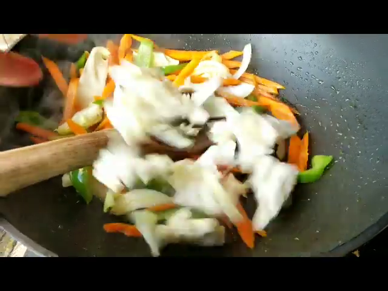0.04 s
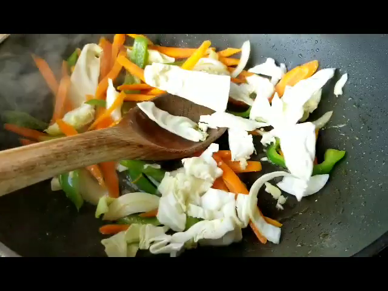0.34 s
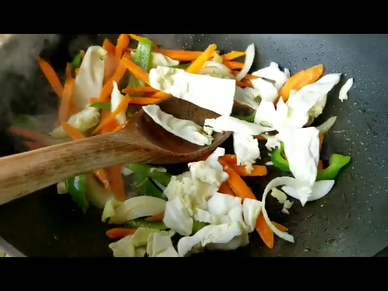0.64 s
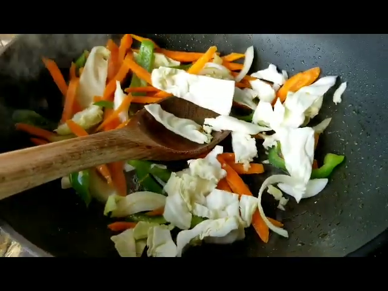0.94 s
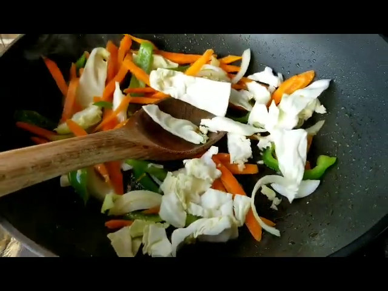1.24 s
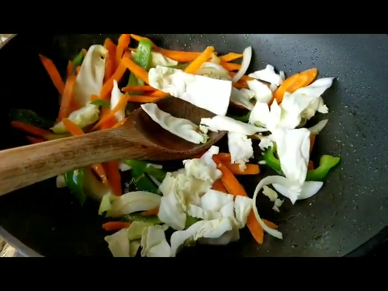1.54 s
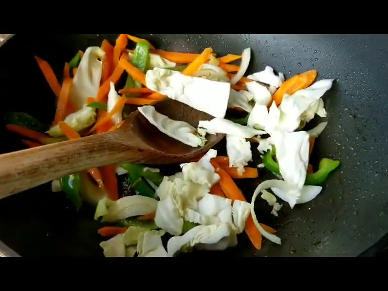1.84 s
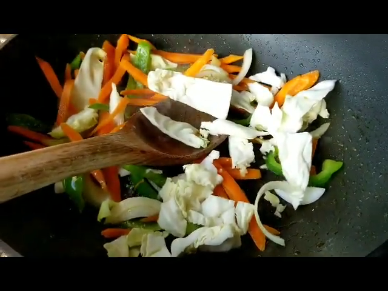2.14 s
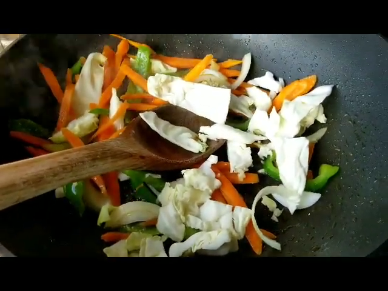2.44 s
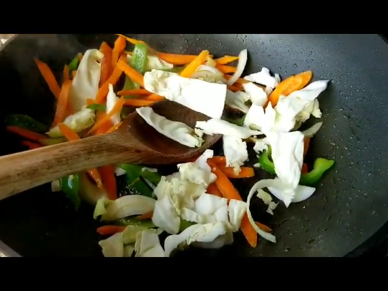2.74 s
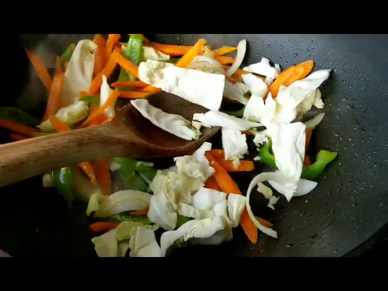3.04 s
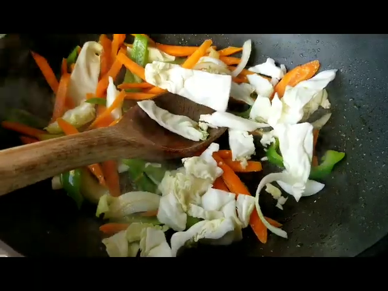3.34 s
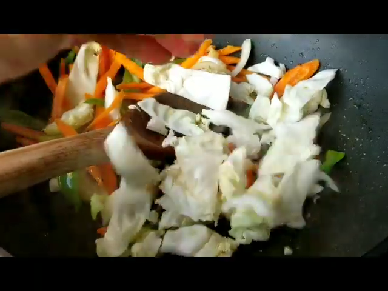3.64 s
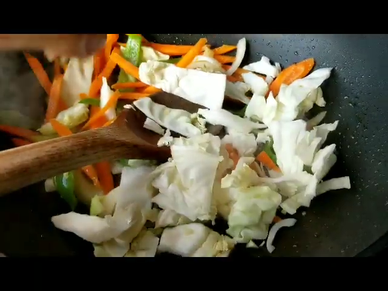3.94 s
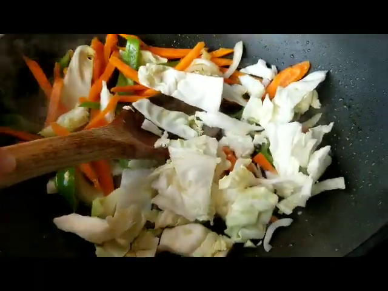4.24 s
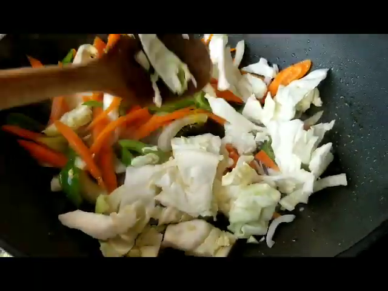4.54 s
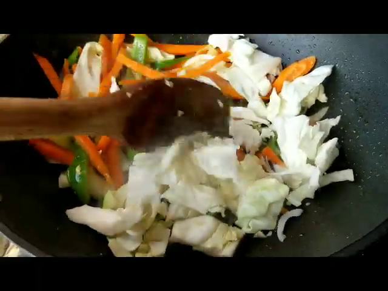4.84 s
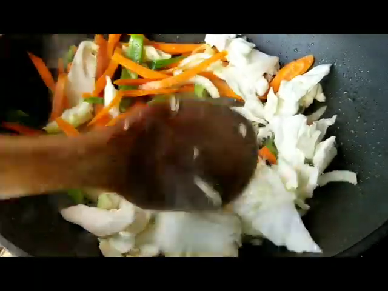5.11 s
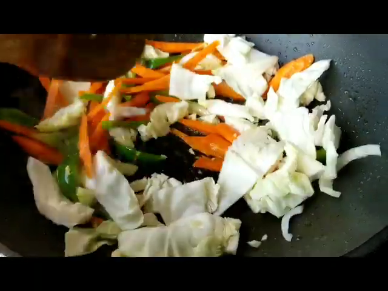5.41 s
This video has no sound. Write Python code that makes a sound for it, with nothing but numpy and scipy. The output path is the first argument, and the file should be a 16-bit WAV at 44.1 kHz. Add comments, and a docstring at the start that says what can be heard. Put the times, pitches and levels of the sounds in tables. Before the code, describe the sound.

Cut vegetables fry in a wok, close to the microphone in a small kitchen. A steady, bright sizzle runs throughout, dotted with sharp pops of oil, and kitchenware clanks lightly early on. Past the middle, a handful of cabbage lands with crisp snaps and the sizzle swells. A wooden spoon then pushes through the leaves with soft knocks, and the hiss flares again. A faint appliance hum lies underneath.

```python
"""A small kitchen, close to a wok of cut vegetables frying in hot oil.
Countless tiny steam bursts make the sizzle; single drops of oil spit above it.
Handfuls of cabbage land and a wooden spoon stirs: leaves snap and the sizzle flares.
Kitchenware knocks and rings the metal. An appliance hum and a draught lie underneath."""
import sys
import numpy as np
from scipy import signal
from scipy.fft import rfft, irfft
from scipy.io import wavfile
from scipy.ndimage import uniform_filter1d

SR = 44100
rng = np.random.default_rng(int(sys.argv[2]) if len(sys.argv) > 2 else 0)


def wav_record(signal):
    """Record a signal, one row per channel, as 16-bit PCM in the file named by sys.argv[1]."""
    frames = np.transpose(np.atleast_2d(signal))
    bounded = np.clip(frames, -1, 1)
    # unit amplitude maps onto the largest positive 16-bit level
    quanta = np.round(bounded * 32767).astype(np.int16)
    wavfile.write(sys.argv[1], SR, quanta)


N = 250047
TIME = np.arange(N) / SR
FREQS = np.fft.rfftfreq(N, 1 / SR)
BAND_LIMIT_HZ = 14650
# balance of the two microphone ports: freq_hz, left_minus_right_db
PORT_BALANCE = [(500, 7.5), (1100, 0.5), (1600, 3), (3200, 2.5), (4200, -0.5), (5500, -8), (7500, 0.5),
                (10000, 0.5), (12300, -2.5), (14000, 0)]


def sizzle():
    """Steam bursts over a smooth hiss, split into fine fizz, wet crackle and air that each flare."""
    # sizzle spectrum: freq_hz, relative_db
    spectrum = [(400, -21.5), (490, -17), (580, -8.5), (720, -9), (1050, -9), (1300, -10.5), (2000, -6.5),
                (2800, -3.5), (4000, -2), (5600, 2.4), (7200, -0.2), (8200, 2.5), (10300, -2), (12400, -3),
                (14400, -6.5)]
    levels_db = (-32, -37.5, -34)  # steady fizz, crackle, air
    crackle_below_hz, air_above_hz = 4000, 11120
    grains = steam_bursts(per_s=3200, spread_db=2.0, flurry_db=1.5, octaves=1.265, decay_s=0.00019)
    hiss = rng.standard_normal((2, N)) * gain_of(0.5 * drift(14))
    frying = rfft(evened(flicker(grains + gain_of(-4) * hiss)))
    frying *= gain_of(curve_at(spectrum, FREQS)) * panned(curve_at(PORT_BALANCE, FREQS))
    frying *= FREQS < BAND_LIMIT_HZ
    crackle = 1 / (1 + (FREQS / crackle_below_hz) ** 6)
    air = 1 - 1 / (1 + (FREQS / air_above_hz) ** 16)
    fizz = 1 - crackle - air
    bands = zip((fizz, crackle, air), levels_db, flares_db())
    return sum(evened(irfft(frying * band, N)) * gain_of(db + boost_db) for band, db, boost_db in bands)


def steam_bursts(per_s, spread_db, flurry_db, octaves, decay_s):
    """Tiny bursts come in flurries; the high ones are the most common and the most uneven."""
    pitches_hz = np.geomspace(600, 15000, 36)
    flurry = gain_of(flurry_db * drift(35))
    out = np.zeros((2, N))
    for hz in pitches_hz:
        onsets = rng.random(N) < per_s / SR * hz / pitches_hz.sum() * flurry
        size_cap = np.interp(hz, [900, 2500], [2.4, 4.2])
        sizes = gain_of(spread_db * np.minimum(rng.exponential(1, N), size_cap))
        grain = reflections(puff(hz, octaves, decay_s, size=2048), wet_db=-3.5, t60_s=0.06)
        out += signal.oaconvolve((onsets * sizes)[None], grain, axes=1)[:, :N]
    return evened(out)


def flares_db():
    """Wet leaves meet hot metal: fizz, crackle and air rise, hold and die away."""
    # flares: start_s, rise_s, hold_s, release_s, fizz_boost_db, crackle_boost_db, air_boost_db
    flares = [(0.1, 0.06, 0.56, 0.41, 1.2, 0.94, 1.2), (3.26, 0.12, 0.045, 0.13, 1.5, 1, 2.5),
              (3.61, 0.063, 0.053, 0.08, 2, 5.5, 0.5), (3.81, 0.14, 0.54, 1, 0.9, 2, 1.5),
              (5.213, 0.17, 0.22, 0.19, 3.8, 2.3, 5.5)]
    first_handful_s, emptier_pan_db = 0.096, -3
    boost_db = np.zeros((3, N)) + emptier_pan_db * (TIME < first_handful_s)
    for start_s, rise_s, hold_s, release_s, *peaks_db in flares:
        rise = np.clip((TIME - start_s) / rise_s, 0, 1)
        release = np.exp(-np.maximum(TIME - start_s - rise_s - hold_s, 0) / release_s)
        boost_db += np.outer(peaks_db, rise * release)
    return boost_db


def flicker(x, depth_db=3, corner_hz=2000):
    """Narrow bands swell and sink at random for hundredths of a second, mostly below the corner."""
    hz, _, spectra = signal.stft(x, SR, nperseg=1024, noverlap=768)
    patches = uniform_filter1d(rng.standard_normal(spectra.shape[1:]), size=5, axis=0)
    patches = evened(uniform_filter1d(patches, size=9, axis=1))
    swing_db = depth_db / np.hypot(1, hz[:, None] / corner_hz)
    return signal.istft(spectra * gain_of(swing_db * patches), SR, nperseg=1024, noverlap=768)[1][:, :N]


def oil_spits():
    """Each drop of oil spits with a single pop."""
    # spits, relative levels: start_s, body_db, crack_db, top_db
    spits = [(0.543, -25, -9, -22), (0.5873, -27, -6, -12), (0.624, -32, -22, -22),
             (0.6404, -21, -15, -9.5), (0.709, -16, -24, -5), (0.8261, -42, -27, -22),
             (0.9287, -11.5, -9, -14), (1.021, -13, -17, -20), (1.101, -30, -24, -11),
             (1.13, -15, -15, -26), (1.291, -12, -7, -30), (1.383, -15, -22, -11), (1.5392, -15, -12, -29),
             (1.7889, -31, -17, -13), (1.8106, -33, -7, -30), (1.9565, -19, -14, -12),
             (2.0707, -17, -8, -27), (2.0802, -26, -19, -3), (2.5922, -36, -4, -11),
             (2.6028, -16, -20, -20), (2.771, -23, -16, -30), (2.774, -26, -20, -27),
             (2.872, -35, -26, -23), (3.009, -36, -21, -15), (3.0554, -20, -11, -22),
             (3.1183, -27, -15, -9), (3.3284, -21, -27, -14), (3.3634, -17.5, -10.5, -29),
             (3.4145, -22, -15, -27), (3.4266, -11.5, -8, -11), (3.494, -11, -14, -8),
             (3.496, -12.5, -12, -29), (3.5796, -22, -10, -12), (4.06, -14, -7, -24),
             (4.325, -22, -22, -13), (4.4257, -19, -15, -16), (4.8357, -17, -25, -10),
             (5.186, -35, -29, -10), (5.485, -33, -17, -23), (5.5525, -34, -18, -8)]
    out = np.zeros((2, N))
    for start_s, *colour_db in spits:
        add(out, start_s, pop(*colour_db))
    return gain_of(13.5) * panned(-1.5) * out


def leaf_snaps():
    """Crisp leaves snap as they land or are stirred: three quick, ever weaker cracks each."""
    # snaps, relative levels: start_s, body_db, crack_db, top_db
    snaps = [(3.462, -8.5, -17, -20), (3.667, -15, -22, -28), (3.6878, -10, -24, -30),
             (3.704, -1.5, -18, -18), (3.7085, -3, -21, -25), (3.7343, -11.5, -24, -35),
             (3.7485, -26, -16, -35), (3.9063, -18, -15, -24), (3.9116, -10, -21, -14),
             (3.9668, -5, -29, -32), (4.062, -9, -27, -36), (4.109, -11, -24, -36), (4.2382, -6, -22, -15),
             (4.4449, -10, -12, -26), (4.509, -9.5, -8, -28)]
    min_gap_s, step_db = 0.0022, -10.5
    out = np.zeros((2, N))
    for start_s, *colour_db in snaps:
        for k in range(3):
            delay_s = k * min_gap_s * rng.uniform(1.0, 1.4)
            add(out, start_s + delay_s, gain_of(k * step_db) * pop(*colour_db))
    return gain_of(11.5) * out


def leaf_rustle(crunches_per_s=110, spread_db=1):
    """Cabbage tumbles in and the spoon pushes through it: runs of small, varied crunches."""
    # runs of crunches: start_s, length_s, relative_db
    runs = [(3.621, 0.16, -7), (3.884, 0.29, -5), (4.381, 0.16, -4), (4.724, 0.19, -19), (5.196, 0.5, -22)]
    crunch_db = np.array([-8, -13, -23])  # body, crack, top
    out = np.zeros((2, N))
    for start_s, length_s, db in runs:
        for size, *tint in rng.uniform(-1, 1, (round(length_s * crunches_per_s), 4)):
            colour_db = db + crunch_db + spread_db * (size + np.array(tint))
            add(out, start_s + length_s * rng.beta(2, 2), pop(*colour_db))
    return out


def pop(body_db, crack_db, top_db, right_lag_s=0.00004):
    """One sharp push and pull of pressure, with a brief scatter off the leaves and the pan wall."""
    hz = np.fft.rfftfreq(512, 1 / SR)
    # freq_hz, level_db
    colour = [(250, body_db - 31), (600, body_db - 24), (3110, body_db), (5600, crack_db),
              (11700, top_db)]
    ports = panned(curve_at(PORT_BALANCE, hz)) * np.exp(-2j * np.pi * np.outer([0, right_lag_s], hz))
    spike = np.roll(irfft(1j * gain_of(curve_at(colour, hz)) * ports), 12, axis=1)
    scatter = puff(6500, octaves=3.2, decay_s=0.0007, size=256)
    return spike + gain_of(-1) * signal.fftconvolve(spike, scatter, axes=1)[:, :spike.shape[1]]


def clanks_and_thuds():
    """Kitchenware clanks ring the metal and leave a low boom; dull thuds hardly ring it."""
    # clanks rattling to rest, relative levels: start_s, thud_db, ring_db, ring_hz
    clanks = [(0.101, -31.5, -30.5, 1070), (0.147, -43, -39, 990), (1.2481, -24, -23, 1080),
              (1.282, -39, -30, 830), (1.295, -36, -25, 1110), (1.343, -31.5, -31.5, 1120),
              (1.741, -38, -27, 1360), (1.755, -35, -24, 1290)]
    # dull knocks on the pan and the low thuds of loud oil spits: start_s, relative_db, pitch_hz
    thuds = [(0.131, -31.5, 740), (2.088, -38.5, 1210), (2.271, -37, 882), (2.44, -29.5, 820),
             (3.055, -38, 950), (3.494, -32, 960), (3.62, -34, 610), (3.69, -36, 1080), (3.705, -29, 1100),
             (3.861, -39, 774), (3.966, -32, 930), (4.403, -33, 880), (4.613, -23.5, 62), (4.826, -36, 695),
             (4.874, -36, 840), (5.155, -33.5, 68.4), (5.156, -50, 880), (5.277, -24, 217),
             (5.279, -37, 940)]
    pan_hz = 257
    out = np.zeros((2, N))
    for start_s, thud_db, ring_db, ring_hz in clanks:
        add(out, start_s, blow(thud_db, pan_hz, ring_db, ring_hz))
        boom = puff(pan_hz, octaves=0.91, decay_s=0.73, size=SR)[:1]
        add(out, start_s, gain_of(thud_db + 17) * boom)
    for start_s, db, pitch_hz in thuds:
        add(out, start_s, blow(db, pitch_hz, ring_db=db - 11, ring_hz=815))
    return reflections(out, wet_db=-14, t60_s=0.25)


def blow(thud_db, thud_hz, ring_db, ring_hz):
    """A thud of a few cycles, broader when high, plus the metal's modes, favouring those near ring_hz."""
    # modes of the metal: pitch_hz, relative_db, t60_s
    metal = [(206.5, 4.5, 0.69), (295, 7.5, 0.46), (654, 6, 0.071), (807, -6, 0.14), (890, -5, 0.078),
             (1032, -12, 0.43), (1078, -3.5, 0.076), (1090, -5.5, 0.21), (1400, -1.5, 0.092),
             (1480, -5, 0.066)]
    thud_decay_s, ring_rise_s = 3.4 / thud_hz, 0.0015
    t = np.arange(SR // 2) / SR
    mid, side = puff(thud_hz, octaves=1 + thud_hz / 2200, decay_s=thud_decay_s, size=len(t))
    thud = mid + 0.55 * side * np.array([[1], [-1]])
    hz, mode_db, t60_s = np.transpose(metal)[:, :, None]
    excitation = 0.043 + np.exp(-(np.log2(hz / ring_hz) / 0.35) ** 2)
    port_phase = rng.normal(0, 0.63, (2, len(metal), 1))
    envelope = gain_of(mode_db - 60 * t / t60_s) * (1 - np.exp(-t / ring_rise_s))
    modes = excitation * envelope * np.sin(2 * np.pi * hz * t + port_phase)
    return gain_of(thud_db + 20) * thud + gain_of(ring_db) * modes.sum(1)


def low_rumble(pitch_hz=295):
    """Uneven low rumble near 300 Hz swells and fades, some of it as leaves shift."""
    # rumble swells: start_s, length_s, level_db
    rumbles = [(0.283, 0.11, -60), (3.16, 0.76, -56.5), (3.624, 0.1, -48.5), (3.856, 0.059, -54),
               (4.47, 0.12, -62), (4.757, 0.18, -55)]
    noise = rng.standard_normal(N) * gain_of(3 * drift(40))
    return swells(rumbles) * evened(bandpass(noise, [0.75 * pitch_hz, 1.25 * pitch_hz]))


def wok_note():
    """The bowl sings a faint, unsteady note that swells and fades."""
    # lingering notes: start_s, length_s, level_db
    notes = [(-0.1, 0.72, -53), (0.68, 0.87, -57.5)]
    return swells(notes) * tone(hz=428, db=4.5 * drift(14), waver_hz=15)


def steam_squeak():
    """A jet of steam under a leaf whistles upward."""
    # glide: time_s, pitch_hz, level_db
    glide = [(3.171, 2200, -52), (3.18, 2220, -39), (3.189, 2420, -42), (3.198, 2950, -41),
             (3.205, 3130, -38), (3.218, 3260, -41), (3.229, 3330, -54)]
    time_s, pitch_hz, level_db = np.transpose(glide)
    envelope_db = np.interp(TIME, time_s, level_db, left=-120, right=-120)
    return tone(np.interp(TIME, time_s, pitch_hz), envelope_db, waver_hz=35)


def appliance_hum():
    """Unsteady low tones in a room rumble that is nearly the same at both ports."""
    # hum tones: pitch_hz, waver_hz, level_db
    partials = [(56.6, 4.1, -56), (113.2, 9.09, -50), (119.2, 8.86, -51.5)]
    # rumble spectrum: freq_hz, relative_db
    spectrum = [(20, -43), (45, -5), (80, 1.5), (130, 1), (170, -1.5), (230, -6.5), (290, -9.5), (400, -15)]
    mid, side = irfft(rfft(rng.standard_normal((2, N))) * gain_of(curve_at(spectrum, FREQS)), N)
    rumble = gain_of(-42.5) * (evened(mid) + 0.4 * evened(side) * np.array([[1], [-1]]))
    hum = sum(tone(hz, db + 2.65 * drift(27), waver_hz) for hz, waver_hz, db in partials)
    return rumble * panned(1) + hum


def draught():
    """Moving air rumbles unevenly, mostly at the left port."""
    air = bandpass(rng.standard_normal((2, N)), edges_hz=[28, 70])
    return gain_of(-55 + 2 * drift(0.78)) * evened(air * panned(8.4))


def reflections(x, wet_db, t60_s):
    """Adds the dense reflections of the pan wall and the room."""
    t = np.arange(SR // 2) / SR
    tail = rng.standard_normal((2, len(t))) * gain_of(-60 * t / t60_s) * (t > 0.001)
    tail /= np.linalg.norm(tail, axis=1, keepdims=True)
    return x + gain_of(wet_db) * signal.oaconvolve(x, tail[:, :x.shape[1]], axes=1)[:, :x.shape[1]]


def puff(hz, octaves, decay_s, size):
    """Decaying band of noise, different at each port, of unit energy."""
    t = np.arange(size) / SR
    edges_hz = np.minimum(hz * 2 ** (np.array([-0.5, 0.5]) * octaves), [SR / 3, SR / 2.2])
    noise = bandpass(rng.standard_normal((2, size)) * np.exp(-t / decay_s), edges_hz)
    return noise / np.linalg.norm(noise, axis=1, keepdims=True)


def tone(hz, db, waver_hz):
    """Wavering sine at an rms level."""
    return np.sqrt(2) * gain_of(db) * np.sin(2 * np.pi * np.cumsum(hz + waver_hz * drift(23.9)) / SR)


def swells(rows):
    """Envelope of half-sine arches."""
    return sum(gain_of(db) * np.sin(np.pi * np.clip((TIME - start_s) / length_s, 0, 1))
               for start_s, length_s, db in rows)


def drift(corner_hz):
    """Slow random wander of unit rms."""
    return evened(irfft(rfft(rng.standard_normal(N)) / (1 + (FREQS / corner_hz) ** 2), N))


def bandpass(x, edges_hz):
    return signal.lfilter(*signal.butter(2, edges_hz, "band", fs=SR), x)


def curve_at(points, hz):
    """Interpolates on a log frequency axis."""
    freq_hz, values = np.transpose(points)
    return np.interp(np.log(hz + 1), np.log(freq_hz), values)


def gain_of(db):
    return 10 ** (np.asarray(db) / 20)


def evened(x):
    """Scales to unit rms."""
    return x / np.sqrt(np.mean(x ** 2) + 1e-20)


def panned(left_minus_right_db):
    return gain_of(np.array([[0.5], [-0.5]]) * left_minus_right_db)


def add(mix, start_s, sound):
    part = mix[:, max(round(start_s * SR), 0):][:, :sound.shape[1]]
    part += sound[:, :part.shape[1]]


def scene():
    """Everything at the stove, with the leaves to the left."""
    frying = sizzle()
    pops = oil_spits() + panned(7.2) * (leaf_snaps() + leaf_rustle())
    stove = frying + reflections(pops, wet_db=-8, t60_s=0.025) + clanks_and_thuds()
    return stove + low_rumble() + wok_note() + steam_squeak() + appliance_hum() + draught()


def record(dry):
    """Loud spits softly overload the microphone; a gate shuts weak low bands; a low-pass follows."""
    ceiling, gate_db, gate_corner_hz = 0.78, -60, 644
    clipped = ceiling * np.tanh(dry / ceiling)
    hz, _, spectra = signal.stft(clipped, SR, nperseg=1024, noverlap=896)
    level = abs(uniform_filter1d(abs(spectra).mean(0), size=5, axis=1)) + 1e-9
    threshold = gain_of(gate_db) / (1 + (hz[:, None] / gate_corner_hz) ** 4)
    opening = 1 / (1 + (threshold / level) ** 10)
    gated = signal.istft(spectra * opening, SR, nperseg=1024, noverlap=896)[1][:, :N]
    lowpass = signal.firwin(511, BAND_LIMIT_HZ, window=("kaiser", 9), fs=SR)
    return signal.oaconvolve(gated, lowpass[None], "same", axes=1)


dry = scene()
out = record(dry)
wav_record(out)
```